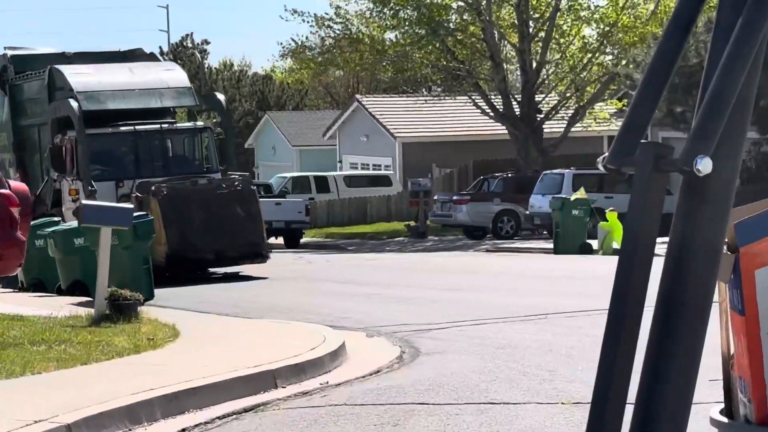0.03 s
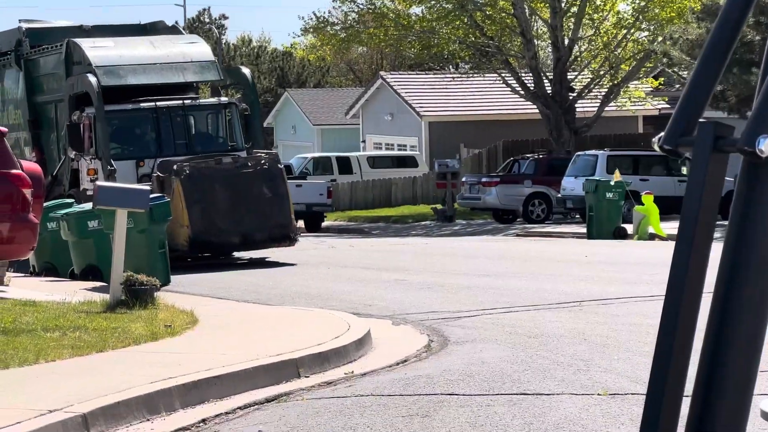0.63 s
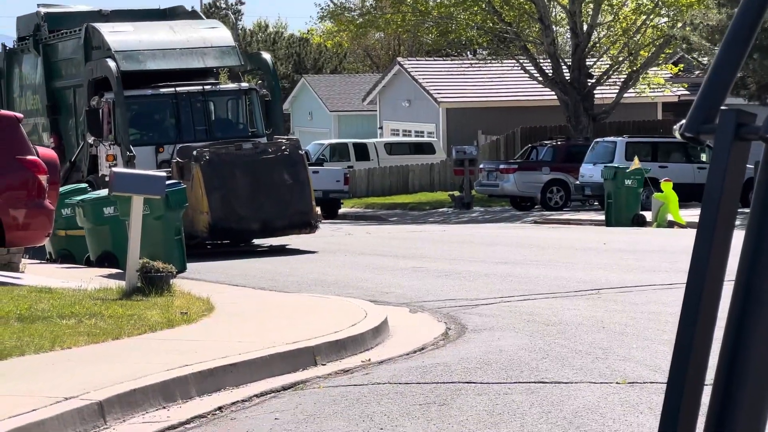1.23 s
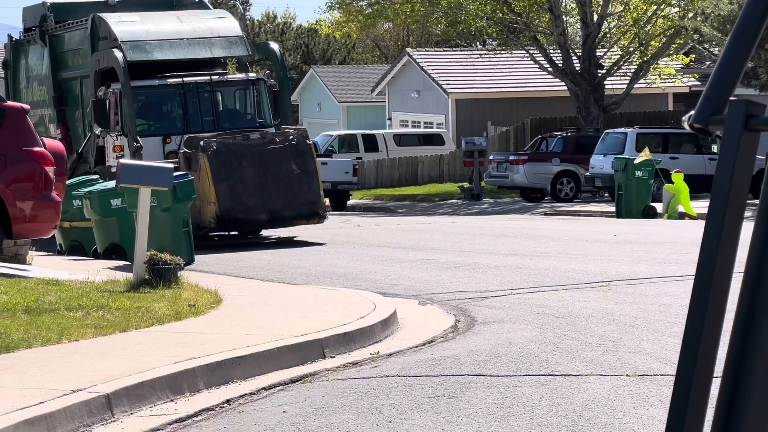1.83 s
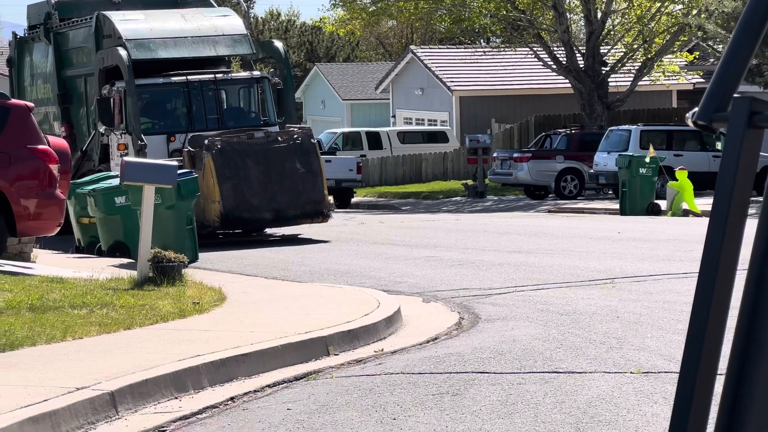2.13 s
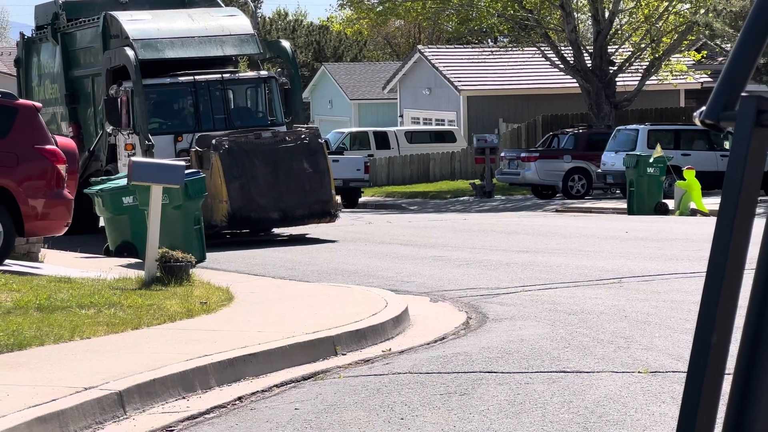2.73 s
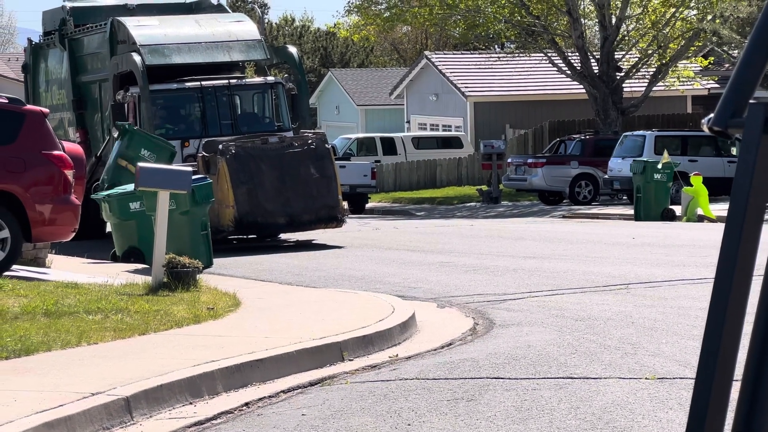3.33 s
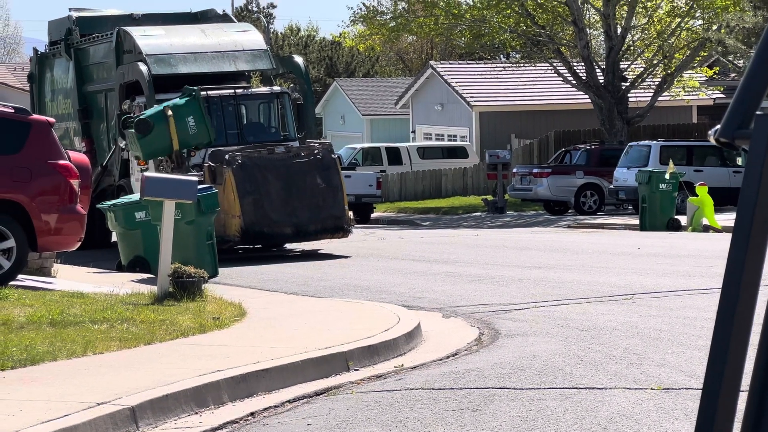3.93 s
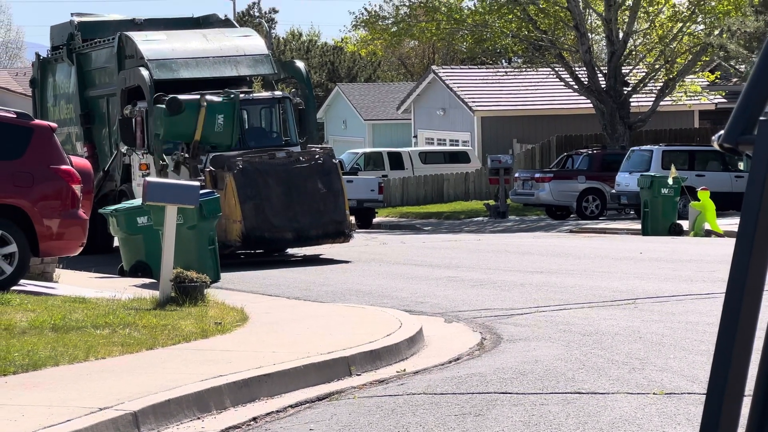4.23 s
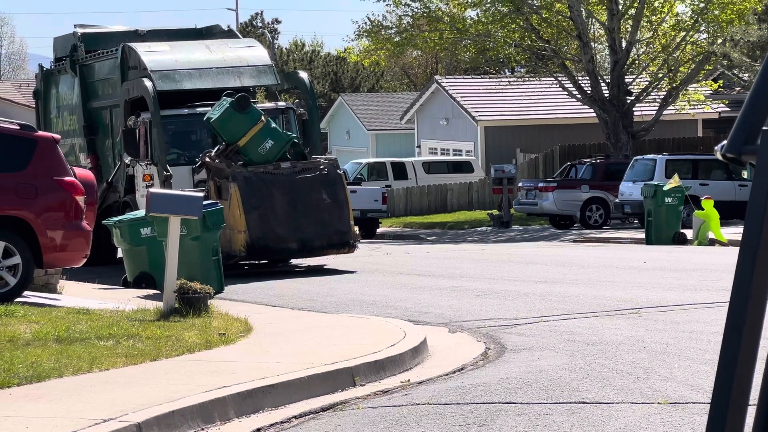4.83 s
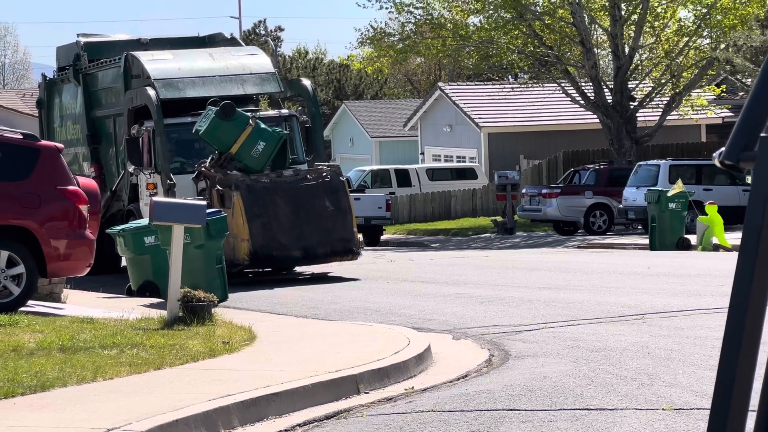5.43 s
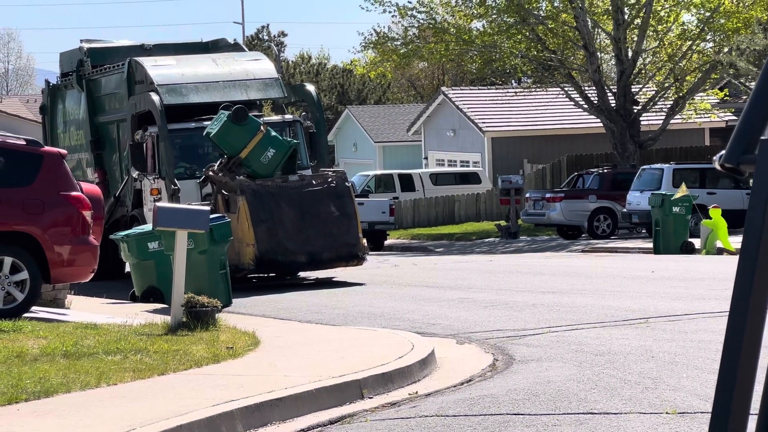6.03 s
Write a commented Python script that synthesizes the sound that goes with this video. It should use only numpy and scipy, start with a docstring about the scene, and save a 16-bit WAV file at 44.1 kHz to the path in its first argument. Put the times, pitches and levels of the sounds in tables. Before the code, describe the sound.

Brakes squeal and a diesel garbage truck idles as its whining hydraulic arm tips a bin, rubbish clattering out, wind buffeting the microphone.

```python
"""A garbage truck stops in a suburban street, diesel idling, wind buffeting the microphone.
Air hisses off; stick-slip brakes squeal for 1.6 s and a dry joint squawks twice. Far birds chirp.
Near 1.7 s the arm clamps a plastic bin; from 2.8 s the hydraulic pump whines up and lifts it with a bang.
From 4.5 s rubbish knocks, rattles and crackles into the steel front hopper.
Throughout, houses echo the knocks, squeals and birds."""
import sys
import numpy as np
from scipy import signal
from scipy.fft import rfft, irfft, next_fast_len
from scipy.io import wavfile

SR = 44100
rng = np.random.default_rng(int(sys.argv[2]) if len(sys.argv) > 2 else 0)


def unload_audio(sound):
    """Save the sound as a 16-bit wav file, at the path given as the first command line argument."""
    columns = np.transpose(np.atleast_2d(sound))
    # keep every value between -1 and 1, then stretch to whole-number steps
    steps = np.round(np.clip(columns, -1, 1) * 32767)
    wavfile.write(sys.argv[1], SR, steps.astype(np.int16))


N = 269010
TIME_S = np.arange(N) / SR
FFT_SIZE = next_fast_len(N + 8192)
BINS_HZ = np.fft.rfftfreq(FFT_SIZE, 1 / SR)

# far bird whistles: start_s, length_s, start_hz, target_hz, level_db
CHIRPS = [(2.148, .055, 4950, 4490, -68), (4.205, .018, 6900, 7050, -70), (4.217, .045, 6000, 5120, -68.5),
          (4.265, .06, 5220, 5180, -71), (4.42, .06, 3980, 3830, -67.5)]
# sparrow calls: start_s, level_db
CHEEPS = [(.61, -67.5), (1.973, -65.5), (3.323, -64.5), (4.329, -66)]
# cheep contour: age_s, pitch_hz
CHEEP_SHAPE = [(0, 3850), (.011, 4420), (.026, 3750), (.042, 3400), (.054, 3500), (.085, 3000)]
# turbulence spectrum: freq_hz, density_db
WIND_COLOUR = [(20, -29), (35, -11), (52, 2.5), (85, -1), (130, -2), (200, -13.5), (350, -31.5), (800, -86),
               (4000, -110)]
# gusts: centre_s, half_width_s, level_db
GUSTS = [(0.049, 0.052, -26), (.26, 0.063, -40), (.62, 0.13, -39.5), (1.431, 0.32, -43.5),
         (1.76, 0.056, -30), (2.179, 0.18, -40), (2.85, 0.098, -33), (3.19, 0.23, -33), (3.4, 0.044, -41),
         (3.64, 0.13, -23), (4.04, 0.16, -40.5), (4.63, 0.13, -36), (4.96, 0.113, -41),
         (5.25, 0.062, -29.5), (5.85, 0.57, -34.5)]
# dull thumps, mostly eddies on the microphone: start_s, level_db, pitch_hz
BUFFETS = [(0.05, -28.5, 71), (0.548, -24.5, 99), (0.729, -20, 124), (1.828, -21.5, 85.4),
           (2.162, -26.5, 210), (2.287, -23.5, 125), (2.819, -22, 148), (2.867, -21, 267),
           (2.88, -14.5, 121), (2.959, -16.5, 143), (3.061, -23.5, 257), (3.08, -20.5, 259),
           (3.143, -16.5, 79.5), (3.17, -16, 102), (3.325, -22, 92), (3.482, -20, 77), (3.538, -11, 127),
           (3.567, -12.5, 266), (3.654, -10.5, 75), (3.716, -13.5, 77.3), (3.86, -25.5, 69.6),
           (4.049, -30.5, 111), (5.234, -20.5, 320), (5.234, -16.5, 107.4), (5.331, -17.5, 220),
           (5.611, -17.5, 263), (5.688, -18.5, 347), (5.997, -25.5, 240)]
# diesel noise spectrum: freq_hz, density_db
IDLE_COLOUR = [(20, -15.5), (45, -11.5), (75, -1), (150, -3), (230, -4), (330, -5), (430, -11.5),
               (700, -12.5), (1150, -19.5), (1800, -17), (2600, -25.5), (4000, -35.5), (5400, -37),
               (6500, -39.5), (9000, -58.5), (15000, -63.5)]
# block and belt hums: pitch_hz, level_db
IDLE_HUMS = [(75, -71.5), (140, -59), (188, -53.5), (581, -67), (1933, -99), (2137, -86.5)]
# pump partials: pitch_ratio, gain_db
PUMP_ORDERS = [(1, 0), (2, -13), (2.5, -15), (5, -6)]
# pump load, peaking with the bin held out level: time_s, gain_db
PUMP_LOAD = [(2.8, -20), (3.2, -6), (3.65, -3.5), (4, 2), (4.4, 0.5), (4.7, -1.5), (6.1, -3)]
# air jet spectrum: freq_hz, density_db
AIR_COLOUR = [(500, -17), (1100, -12.5), (2100, -0.5), (2900, -2), (3500, 1.5), (4200, -2.5), (4700, 3),
              (5300, -2.5), (6700, -1), (8700, -9), (10200, -12), (12000, -23), (15500, -19.5)]
# dry joint slips: start_s, hold_s, pitch_hz, level_db, rasp_gain_db
SQUAWKS = [(.85, .022, 2030, -44.5, 3.5), (.943, .012, 2010, -46, -1.5)]
# joint's pure note: pitch_ratio, gain_db
SQUAWK_MODES = [(1, 0), (2, -19)]
# joint's rasp bands: pitch_ratio, width_hz, gain_db
SQUAWK_RASP = [(1, 300, -1.5), (.94, 650, -5), (.37, 520, -2.5), (2.02, 500, -12), (1.9, 3800, -11.5)]
# brake notes: start_s, rise_s, hold_s, pitch_hz, glide_hz_per_s, hold_end_db, flutter_db
SQUEALS = [ (-.03, .02, .04, 5005, -400, -36, .5), (.045, .02, .03, 4975, -900, -44, 2),
           (-.02, .03, .1, 3480, 0, -53, 3), (.11, .02, .04, 4830, -2200, -48.5, 4),
           (.45, .03, .07, 4610, 0, -65, 3), (.1, .05, .14, 10195, 0, -62, 3),
           (.15, .02, .13, 4590, 0, -54.5, 4), (.22, .02, .12, 5053, 0, -61, 2),
           (.24, .15, .2, 13150, 0, -72, 2), (.38, .03, .23, 5050, 0, -49.5, 1.4),
           (.58, .09, .02, 9095, 0, -53, 2), (.655, .03, .06, 5050, 0, -47, .5),
           (.72, .02, .05, 4450, 0, -61, 1), (.75, .02, .14, 9105, 0, -59, 2),
           (.8, .02, .11, 5052, 0, -61, 3), (.82, .02, .12, 4555, 200, -60, 2),
           (.84, .05, .16, 9205, 230, -62, 3), (.925, .03, .29, 4672, 30, -48, 1.1),
           (.98, .04, .33, 4930, 230, -67, 3), (1, .03, .2, 5330, 0, -72, 3),
           (1.02, .1, .1, 14550, 0, -72, 2), (1.07, .1, .22, 13187, 0, -72, 2),
           (1.29, .02, .15, 4690, 150, -54, 2.2), (1.29, .06, .04, 9075, 0, -70, 1),
           (1.315, .02, .08, 5460, 450, -58, 1.2), (1.43, .02, .1, 5505, 0, -63.5, 2),
           (1.5, .03, .07, 4725, 0, -65, 2)]
# spells of crumpling: start_s, rise_s, hold_s, t60_s, level_db
CRACKLES = [(4.84, .17, .09, .55, -54)]
# crumpling spectrum: freq_hz, density_db
CRACKLE_COLOUR = [(500, -23), (1200, 21), (1900, 6), (3500, 9.5), (6500, -1.5), (9500, -17), (15000, -26)]
# spells of rattling: start_s, rise_s, hold_s, t60_s, level_db, tilt_db_per_octave
RATTLES = [(0.472, 0.036, 0.028, 1.18, -40, -1.5), (1.192, 0.081, 0.086, 1.43, -36, 0.5),
           (1.587, 0.13, 0.13, 0.61, -38, 1), (1.997, 0.15, 0.37, 0.39, -50.5, -1.5),
           (2.936, 0.02, 0.016, 0.54, -24.5, -1.5), (4.497, 0.039, 0.096, 1.43, -34.5, 1.5),
           (4.78, 0.27, 0.023, 1.74, -38.5, 1.45), (5.348, 0.16, 0.03, 0.41, -33, 0),
           (5.561, 0.02, 0.33, 1, -37, -1)]
# rattle spectrum: freq_hz, density_db
RATTLE_COLOUR = [(30, -32), (70, -6), (130, 6), (240, 0), (330, 3), (420, -12), (560, -8), (800, -7.5),
                 (1100, -17), (1500, -13), (2000, -21.5), (3000, -27), (6500, -38), (9500, -53.5),
                 (15000, -64)]
# steel hopper panels: pitch_hz, gain_db, t60_s
HOPPER_MODES = [(84.1, 2, 1), (108, 1.5, 0.35), (147, -1, 0.29), (237, -2, 0.27)]
# hopper jolts: start_s, level_db, tilt_db_per_octave
JOLTS = [(1.685, -34, 2.5), (2.962, -19.5, -6), (4.548, -35.5, 10)]
# hollow bin and steel arm: pitch_hz, gain_db, t60_s
BODY_MODES = [(247, 0, .36), (301, -7, .25), (440, -9, .14), (479, -7, .16), (528, -2, .22),
              (705, -16, .15), (793, -15, .2), (904, -18, .15), (1104, -19, .25), (1933, -20, .25),
              (2128, -21, .22), (2413, -22, .2), (2625, -22, .25), (2824, -24, .25)]
# clack of the struck spot: pitch_hz, gain_db, t60_s
CLACK_MODES = [(490, 1, .09), (790, -2.5, .07), (1740, -4, .06), (1900, -7, .06), (2230, -6, .05),
               (2550, -9, .04)]
# blows of arm, bin and rubbish:
# start_s, level_db, boom_db, bright_db, chatter_t60_s, ring_db, clack_db, clack_pitch_ratio
KNOCKS = [(.456, -39.5, 3, -6.5, 0.35, -22, 2, 1), (.514, -42, 12, 2, .05, -8, -6, 1.1),
          (1.666, -28.5, 0.5, -10, 0.11, -20, -9, .95), (1.681, -39.5, 12, -4, 0.09, 2, 5, 1.1),
          (1.817, -34, 2.5, -10.5, 0.21, -20, -3.5, 1.03), (2.934, -33.5, 2.5, -1.5, 0.25, -1, 2.5, 0.96),
          (2.951, -24, -13, -7.5, 0.066, -19.5, -10.5, 1.15),
          (2.956, -18, -7.5, -7.5, 0.1, -12, -8.5, 1.03), (2.962, -36, 6.5, -9.5, 0.071, 14, 12, .67),
          (3.046, -34.5, -12, -14, 0.75, 1.5, -5, 1.6), (3.564, -48.5, 4.5, -14, 0.032, 7, -6, 1.05),
          (4.516, -32.5, -5, -14, 0.21, -22, -10, 0.64), (4.524, -40.5, -5, -1, 0.097, -4, 3, 1.57),
          (4.537, -24.5, -13.5, -16.5, 0.17, -13, -8, 0.9), (4.675, -27.5, -12, 3, 0.016, -19, -14, 0.6),
          (4.679, -39, -5.5, -10.5, 0.14, -22, -1.5, 1.68), (4.773, -36.5, -6, -2, 0.015, -22, -8.5, 1.3),
          (4.814, -31, -16, -2, 0.032, -22, -10, 1.5), (4.856, -41, -19, -8.5, 0.12, -8, 2, 1.04),
          (4.896, -39, 9, -9, 0.12, -11, 1.5, 1.1), (4.966, -38.5, -7.5, -8.5, 0.62, -14, -7, 1.6),
          (5.041, -36, -6.5, -7, .047, -15, -7.5, 1.4), (5.055, -36, -0.5, -8, 0.32, -13, -4.5, 1.1),
          (5.123, -44.5, 9.5, -2, 0.21, 6.5, 3, 1), (5.298, -42.5, 8, -12.5, .08, -14, -1.5, .8),
          (5.367, -45, -2, -1, 0.18, 3, -7, 1.1), (5.392, -33.5, 1, -17, 0.2, -4.5, -0.5, .88),
          (5.428, -33.5, -4, -14.5, 0.19, -13, -3, .92), (5.494, -27, 0, -13.5, 0.19, -2, -1.5, 1.04),
          (5.574, -35, -1, -1, 0.18, -9, 2, .95), (5.612, -48.5, 1, -8, 0.072, 14.5, 7, 1),
          (5.671, -42, 14.5, -5, .08, -12, -1, .97), (5.747, -43.5, -2, -11, 0.063, -7, -2, 1.1),
          (5.774, -43.5, 4, -13, 0.23, 5, -7.5, .9), (5.839, -57, 16, -18, .06, 15.5, -10, 1.7),
          (5.921, -40, -15, -5.5, 0.33, -17, -1, 0.92), (6.064, -48.5, 7.5, -1, .1, 1, -10, 1)]
# knock spectrum: freq_hz, density_db
KNOCK_COLOUR = [(40, -17.5), (90, 13.5), (240, 10.5), (500, 14), (800, 4), (1300, -2), (2200, -4),
                (4000, -8.5), (6500, -9.5), (9500, -28.5), (15000, -43.5)]
# street echo decay: freq_hz, t60_s
STREET_T60 = [(100, 0.5), (500, 1), (2000, 1), (5000, 1), (12000, 0.6)]
# likeness of the two microphone ports: freq_hz, coherence
PORT_COHERENCE = [(50, .96), (150, .94), (500, .95), (900, .9), (1150, .55), (1350, .15), (1700, .5),
                  (2100, .95), (4000, .98), (15000, .96)]
# port phase: freq_hz, left_lead_rad
PORT_PHASE = [(50, .05), (600, .15), (1100, 0), (1300, .6), (1430, 2.3), (1650, .9), (1850, .8), (2050, .1),
              (2400, .4), (3300, .6), (5000, .35), (6800, .1), (8500, -.1), (9150, -.9), (10200, -2.3),
              (13150, 1.2), (14500, 0)]
# port balance: freq_hz, left_over_right_db
PORT_BALANCE = [(60, 0.5), (1100, 1.1), (1450, -8), (1950, -3.5), (2500, 0.5)]
# microphone response: freq_hz, gain_db
MIC_COLOUR = [(20, 2), (7000, -2.5), (7250, -13), (7450, -10.5), (7700, -13.5), (8000, 0.5), (10100, 5),
              (10900, -29.5), (12100, -2.5), (12700, 1)]


def gain_of(db):
    """Decibels to gain."""
    return 10 ** (np.asarray(db) / 20)


def unit_rms(x):
    """Scale to rms 1."""
    return x / np.sqrt(np.mean(x ** 2) + 1e-20)


def lookup(table, hz):
    """Interpolate on a log-frequency axis."""
    freq_hz, value = np.transpose(table)
    return np.interp(np.log(hz + 1), np.log(freq_hz + 1), value)


def add(mix, start_s, sound):
    """Mix in at start_s."""
    part = mix[max(round(start_s * SR), 0):][:len(sound)]
    part += sound[:len(part)]


def filtered(x, response):
    """Apply a response given on BINS_HZ."""
    return irfft(rfft(x, FFT_SIZE) * response, FFT_SIZE)[..., :N]


def coloured(x, colour):
    """Shape the spectrum; rms 1."""
    return unit_rms(filtered(x, gain_of(lookup(colour, BINS_HZ))))


def drift(cutoff_hz):
    """Low-passed noise; rms 1."""
    return unit_rms(filtered(rng.standard_normal(N), 1 / (1 + (BINS_HZ / cutoff_hz) ** 4)))


def tone(hz):
    """Sine on a pitch curve; rms 1."""
    return np.sqrt(2) * np.sin(2 * np.pi * (np.cumsum(hz) / SR + rng.random()))


def envelope(start_s, rise_s, hold_s, t60_s):
    """Linear rise, hold, exponential release."""
    age_s = TIME_S - start_s
    return np.clip(age_s / rise_s, 0, 1) * gain_of(-60 * np.maximum(age_s - rise_s - hold_s, 0) / t60_s)


def causal(db):
    """Impulse response for a gain curve, phase by Hilbert transform."""
    log_gain = np.log(gain_of(np.r_[db, db[-2:0:-1]]))
    return np.fft.ifft(np.exp(np.conj(signal.hilbert(log_gain)))).real


def ringing(modes, t, ratio=1):
    """Decaying struck modes, random polarity."""
    return sum(gain_of(db - 60 * t / t60_s) * rng.choice([-1, 1]) * np.sin(2 * np.pi * hz * ratio * t)
               for hz, db, t60_s in modes)


def street(x, echoes_per_s=2500, gap_s=.012):
    """Scattered echoes off houses and parked cars; decay varies by band."""
    taps = rng.standard_normal(SR) * (rng.random(SR) < echoes_per_s / SR) * (TIME_S[:SR] > gap_s)
    hz, t, spectra = signal.stft(taps, SR, nperseg=256)
    decay = gain_of(-60 * t / lookup(STREET_T60, hz)[:, None])
    tail = signal.istft(spectra * decay, SR, nperseg=256)[1]
    return signal.fftconvolve(x, tail / np.linalg.norm(tail))[:N]


def ports(x):
    """Two close microphone ports: offsets in phase and level, plus a diffuse share."""
    spectra = signal.stft(x, SR, nperseg=512)[2]
    scrambled = spectra * np.exp(2j * np.pi * rng.random(spectra.shape))
    diffuse = signal.istft(scrambled, SR, nperseg=512)[1][:N]
    coherence = lookup(PORT_COHERENCE, BINS_HZ)
    to_left = np.exp(.5j * lookup(PORT_PHASE, BINS_HZ)) * gain_of(lookup(PORT_BALANCE, BINS_HZ) / 2)
    mid = filtered(x, np.sqrt((1 + coherence) / 2))
    side = filtered(diffuse, np.sqrt(1 - coherence))
    return np.array([filtered(mid + side, to_left), filtered(mid - side, 1 / to_left)])


def birds(second_voice_ratio=1.16, second_voice_db=-6, flutter_db=2.5):
    """Thin whistles that slide and level off; a sparrow's hoarse two-voiced cheep."""
    out = np.zeros(N)
    for start_s, length_s, start_hz, target_hz, db in CHIRPS:
        n = round(length_s * SR)
        hz = target_hz + (start_hz - target_hz) * np.exp(-2.5 * np.linspace(0, 1, n))
        add(out, start_s, gain_of(db) * signal.windows.tukey(n, .5) * tone(hz))
    warble = 1 + .02 * drift(300)
    flutter = unit_rms(gain_of(flutter_db * drift(90)))
    n = round(CHEEP_SHAPE[-1][0] * SR)
    for start_s, db in CHEEPS:
        span = round(start_s * SR) + np.arange(n)
        hz = np.interp(TIME_S[:n], *np.transpose(CHEEP_SHAPE)) * warble[span]
        voices = tone(hz) + gain_of(second_voice_db) * tone(second_voice_ratio * hz)
        add(out, start_s, gain_of(db) * signal.windows.tukey(n, .25) * flutter[span] * voices)
    return out


def eddy(hz, rise_cycles=.95, sag=.28):
    """An eddy shoves the diaphragm for a few slowing swings, near hz at the peak."""
    age = TIME_S[:SR // 6] * hz / rise_cycles  # 1 at the peak
    phase_cycles = 1.269 * rise_cycles * np.log1p(sag * age) / sag
    return (age * np.exp(1 - age)) ** 2 * np.sin(2 * np.pi * phase_cycles)


def wind(breeze_db=-55, lump_db=2, eddy_gain_db=-5, eddy_hz=230, eddy_count=70):
    """Lumpy turbulence and small random eddies swell with each gust; strong buffets on top."""
    gusts = sum(gain_of(db) * np.exp(-((TIME_S - centre_s) / half_width_s) ** 2)
                for centre_s, half_width_s, db in GUSTS)
    turbulence = coloured(rng.standard_normal(N) * gain_of(lump_db * drift(25)), WIND_COLOUR)
    for place, size, octave in rng.random((eddy_count, 3)):
        swirl = eddy(eddy_hz * 2 ** (octave - .5))
        add(turbulence, place * TIME_S[-1], 2 * size * gain_of(eddy_gain_db) * swirl)
    out = (gain_of(breeze_db) + gusts) * turbulence
    for start_s, db, hz in BUFFETS:
        add(out, start_s, gain_of(db) * eddy(hz))
    return out


def engine(level_db=-45.5, firing_hz=34.5, waver=.0067):
    """Idling diesel: fan and combustion noise pulsing at each firing; block and belts hum."""
    firing = 1 + .1 * tone(firing_hz * (1 + .04 * drift(10)))
    wash = coloured(firing * rng.standard_normal(N), IDLE_COLOUR) * gain_of(level_db + .5 * drift(22))
    hums = sum(gain_of(db + 2 * drift(1.5)) * tone(hz * (1 + waver * drift(9.8))) for hz, db in IDLE_HUMS)
    return wash + hums


def pump(pitch_hz=349, waver=.0015, base_db=-55.5, flutter_db=1):
    """Hydraulic whine: near-steady pitch, louder under load."""
    hz = pitch_hz * (1 + waver * drift(7.1))
    load = gain_of(np.interp(TIME_S, *np.transpose(PUMP_LOAD)))
    return load * sum(gain_of(base_db + db + flutter_db * drift(7.5)) * tone(ratio * hz)
                      for ratio, db in PUMP_ORDERS)


def air(level_db=-41, split_hz=5030, low_t60_s=2.1, treble_t60_s=.7):
    """The brake valve's jet fades and dulls as pressure falls."""
    jet = gain_of(level_db) * coloured(rng.standard_normal(N), AIR_COLOUR)
    low = filtered(jet, 1 / (1 + (BINS_HZ / split_hz) ** 4))
    return low * gain_of(-60 * TIME_S / low_t60_s) + (jet - low) * gain_of(-60 * TIME_S / treble_t60_s)


def squawk(rise_s=.018, sag_hz=100, sag_s=.035, waver_hz=14, throb_db=2):
    """A dry joint slips as the truck settles: a short rasp round a note that sags and rings on."""
    out = np.zeros(N)
    for start_s, hold_s, top_hz, level_db, rasp_db in SQUAWKS:
        age_s = np.maximum(TIME_S - start_s, 0)
        hz = top_hz - sag_hz * (1 - np.exp(-age_s / sag_s)) + waver_hz * drift(120)
        note = sum(gain_of(db) * tone(ratio * hz) for ratio, db in SQUAWK_MODES)
        note *= gain_of(throb_db * drift(60))
        rasp = sum(gain_of(db) * tone(np.full(N, ratio * top_hz)) * drift(width_hz / 2)
                   for ratio, width_hz, db in SQUAWK_RASP)
        out += gain_of(level_db) * envelope(start_s, rise_s, hold_s, t60_s=.3) * note
        out += gain_of(level_db + rasp_db) * envelope(start_s, rise_s, hold_s, t60_s=.17) * rasp
    return out


def brakes(t60_s=.17, swell_db=2.5, waver_hz=6):
    """Stick-slip sets drum modes singing in turn; each swells, flutters and rings out."""
    out = np.zeros(N)
    for start_s, rise_s, hold_s, pitch_hz, glide_hz_per_s, hold_end_db, flutter_db in SQUEALS:
        length_s = rise_s + hold_s
        age_s = np.clip(TIME_S - start_s, 0, length_s)
        level_db = hold_end_db - swell_db * (1 - age_s / length_s) + flutter_db * drift(41)
        hz = pitch_hz + glide_hz_per_s * age_s + waver_hz * drift(80)
        out += envelope(start_s, rise_s, hold_s, t60_s) * gain_of(level_db) * tone(hz)
    return out


def crackle(snaps_per_s=450, spread_db=4, snap_s=.0005, clump_db=3.5):
    """Bags and packaging crumple as they slide out: a dense spray of tiny bright snaps."""
    sizes = gain_of(spread_db * np.minimum(rng.exponential(1, N), 4))
    impulses = sizes * (rng.random(N) < snaps_per_s / SR)
    snaps = signal.lfilter([1], [1, -np.exp(-1 / (snap_s * SR))], impulses) * rng.standard_normal(N)
    sound = coloured(snaps * gain_of(clump_db * drift(35)), CRACKLE_COLOUR)
    return sound * sum(gain_of(db) * envelope(*timing_s) for *timing_s, db in CRACKLES)


def contacts(pieces=26, hits_per_s_at_1khz=170, spread_db=3.2, decay_cycles=2.5):
    """Cans, boxes and loose parts collide at random and ring briefly; small ones more often."""
    t, out = TIME_S[:SR // 20], np.zeros(N)
    for hz in np.geomspace(130, 9000, pieces) * rng.uniform(.95, 1.05, pieces):
        count = round(hits_per_s_at_1khz * np.sqrt(hz / 1000) * N / SR)
        onsets = rng.integers(0, N, count)
        sizes = gain_of(spread_db * np.minimum(rng.exponential(1, count), 4))
        hits = np.zeros(N)
        hits[onsets] = sizes * rng.choice([-1, 1], count)
        ring = np.exp(-t * hz / decay_cycles) * np.cos(2 * np.pi * hz * t)
        out += np.sqrt(hz) * unit_rms(signal.oaconvolve(hits, ring)[:N])
    return unit_rms(out)


def rattle(scrape_gain=.5, clump_db=2, hollow_db=-8):
    """Clumped contacts and the scrape of sliding rubbish ring the hollow body."""
    t = TIME_S[:SR // 3]
    clatter = (contacts() + scrape_gain * rng.standard_normal(N)) * gain_of(clump_db * drift(15))
    ring = sum(gain_of(db - 60 * t / t60_s) * np.sin(2 * np.pi * hz * t) for hz, db, t60_s in BODY_MODES)
    hollow = unit_rms(signal.fftconvolve(clatter, ring)[:N])
    sound = coloured(clatter, RATTLE_COLOUR) + gain_of(hollow_db) * hollow
    octaves = np.log2(np.clip(BINS_HZ, 150, 8000) / 550)
    return sum(envelope(*timing_s) * filtered(sound, gain_of(db + tilt * octaves))
               for *timing_s, db, tilt in RATTLES)


def hopper(rise_s=.0073, waver=.0277):
    """Heavy jolts set the steel panels booming; the big bang booms deepest, lighter jolts ring higher."""
    out = np.zeros(N)
    for hz, mode_db, t60_s in HOPPER_MODES:
        panel = gain_of(mode_db) * tone(hz * (1 + waver * drift(30))) / np.sqrt(2)
        octaves = np.log2(hz / HOPPER_MODES[0][0])
        for start_s, db, tilt in JOLTS:
            out += gain_of(db + tilt * octaves) * envelope(start_s, rise_s, 0, t60_s) * panel
    return out


def knocks(crack_db=1, crack_s=.006, grit_db=3, chatter_rise_s=.0015, boom_rise_s=.0056, boom_t60_ratio=.92):
    """Each blow: crack, contact chatter and pitched clack; the hollow body rings and booms just after."""
    out, t = np.zeros(N), TIME_S[:SR // 2]
    hz = np.fft.rfftfreq(4096, 1 / SR)
    bass_share = 1 / (1 + (hz / 850) ** 4)
    treble_share = 1 / (1 + (4000 / (hz + 1)) ** 6)
    colour_db = lookup(KNOCK_COLOUR, hz)
    colour_db -= 10 * np.log10(np.mean(gain_of(2 * colour_db) * (1 - bass_share)))  # upper band: power 1
    crack = gain_of(crack_db) * np.exp(-t / crack_s)
    for start_s, db, boom_db, bright_db, t60_s, ring_db, clack_db, clack_ratio in KNOCKS:
        hiss, grit, rumble = rng.standard_normal((3, len(t)))
        chatter_shape = (1 - np.exp(-t / chatter_rise_s)) * (gain_of(-60 * t / t60_s) + crack) / 2
        chatter = unit_rms(hiss * gain_of(grit_db * grit)) * chatter_shape
        boom = rumble * (1 - np.exp(-t / boom_rise_s)) * gain_of(-60 * t / (t60_s * boom_t60_ratio))
        top_db = colour_db + 10 * np.log10(1 - bass_share + 1e-6) + bright_db * treble_share
        low_db = colour_db + 10 * np.log10(bass_share) + boom_db
        blow = signal.fftconvolve(chatter, causal(top_db)) + signal.fftconvolve(boom, causal(low_db))
        ring = gain_of(ring_db) * ringing(BODY_MODES, t)
        clack = gain_of(clack_db) * ringing(CLACK_MODES, t, clack_ratio)  # stiffer spot, higher pitch
        add(out, start_s, gain_of(db) * (blow[:len(t)] + ring + clack))
    return out


def scene(knock_wet_db=-11, squeal_wet_db=-12, bird_wet_db=-4):
    """Truck, birds, echoes and wind at the two ports."""
    blows = knocks() + crackle()
    squeals = brakes() + squawk()
    chirps = birds()
    echoes = street(gain_of(knock_wet_db) * blows + gain_of(squeal_wet_db) * squeals
                    + gain_of(bird_wet_db) * chirps)
    mix = blows + hopper() + squeals + chirps + echoes + air() + engine() + pump() + rattle() + wind()
    return ports(mix)


def record(dry, fade_s=.004, low_cut_hz=33, high_cut_hz=15700):
    """End fades, microphone bass roll-off and port notches, band limit."""
    fades = np.clip(np.minimum(TIME_S, TIME_S[-1] - TIME_S) / fade_s, 0, 1)
    response = gain_of(lookup(MIC_COLOUR, BINS_HZ)) / np.sqrt(1 + (low_cut_hz / (BINS_HZ + 1)) ** 6)
    low_pass = signal.firwin(511, high_cut_hz, window=("kaiser", 9), fs=SR)
    return signal.oaconvolve(filtered(dry * fades, response), low_pass[None], "same")


dry = scene()
out = record(dry)
unload_audio(out)
```